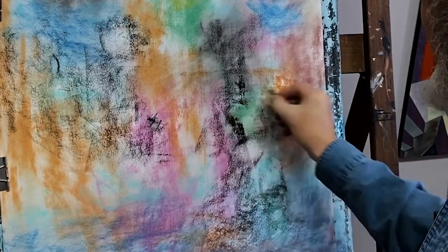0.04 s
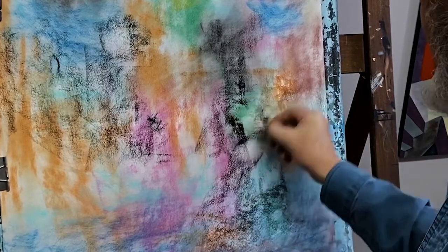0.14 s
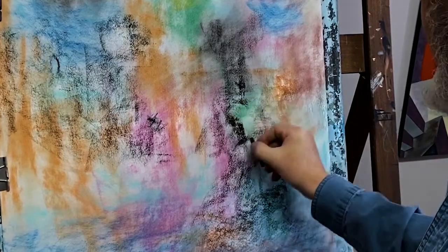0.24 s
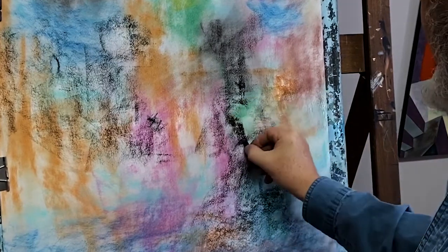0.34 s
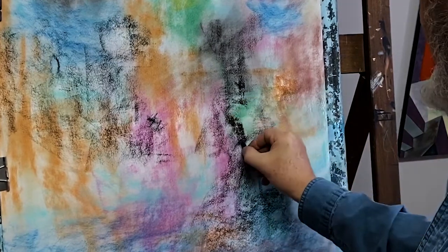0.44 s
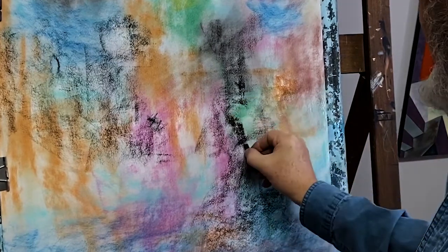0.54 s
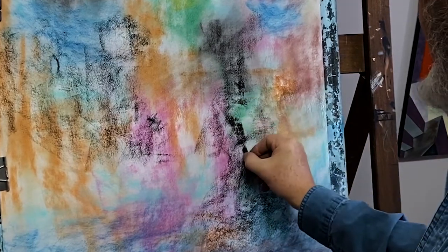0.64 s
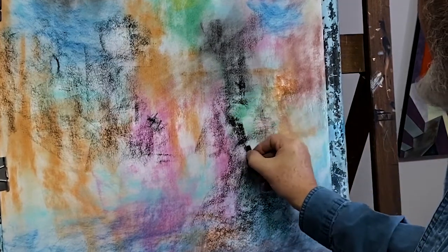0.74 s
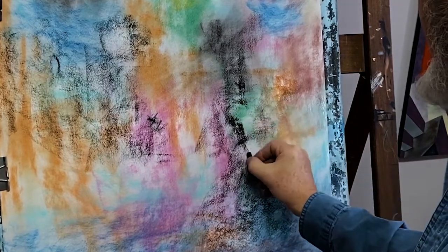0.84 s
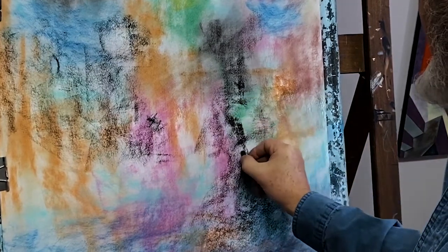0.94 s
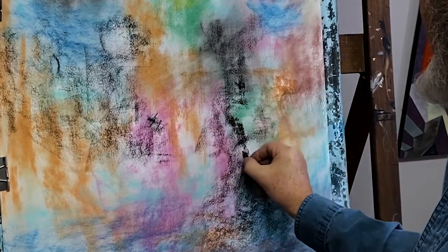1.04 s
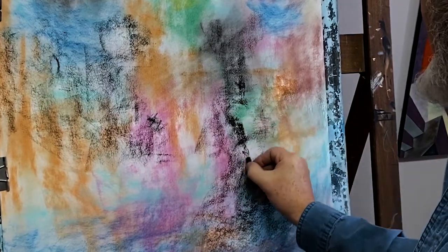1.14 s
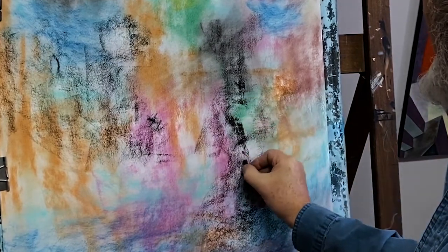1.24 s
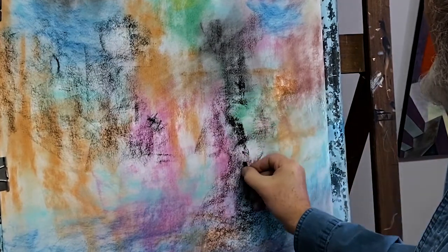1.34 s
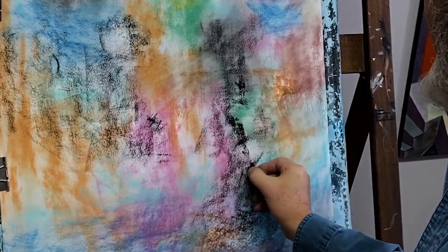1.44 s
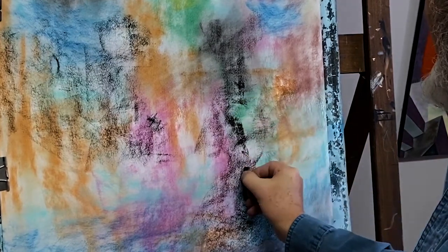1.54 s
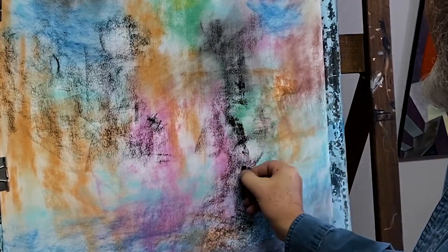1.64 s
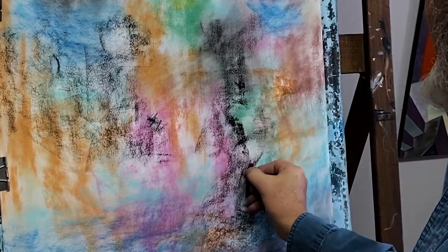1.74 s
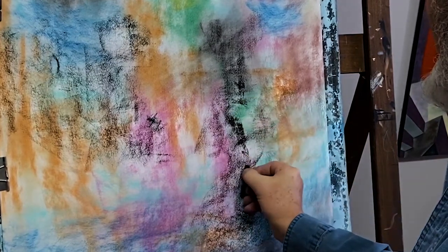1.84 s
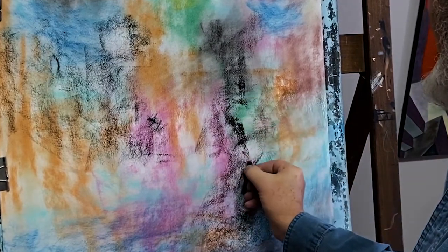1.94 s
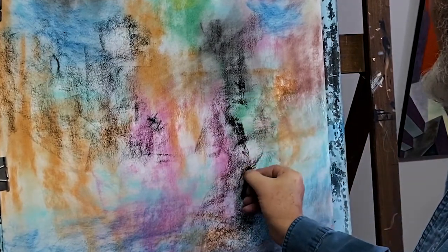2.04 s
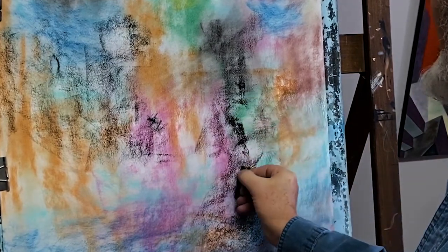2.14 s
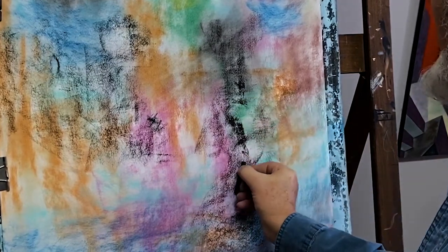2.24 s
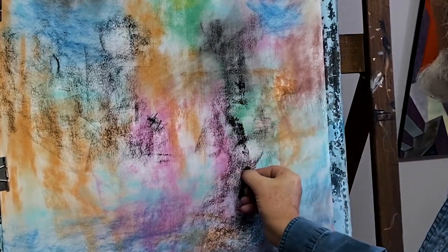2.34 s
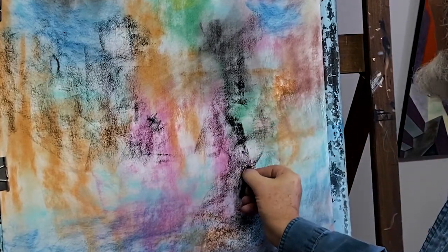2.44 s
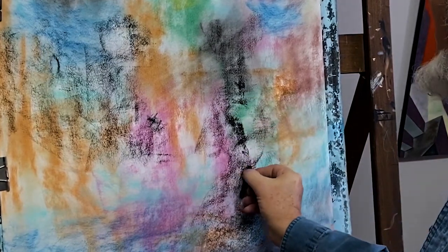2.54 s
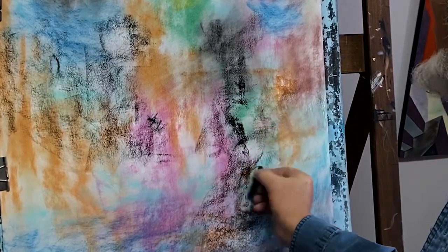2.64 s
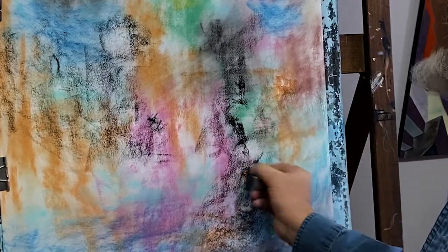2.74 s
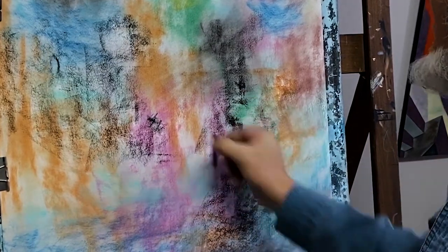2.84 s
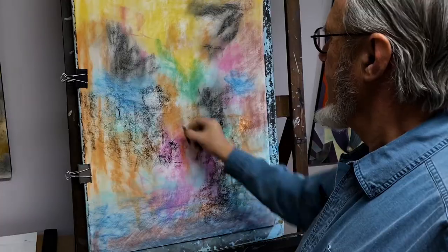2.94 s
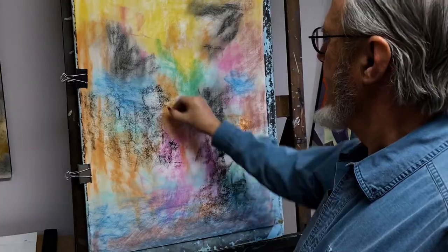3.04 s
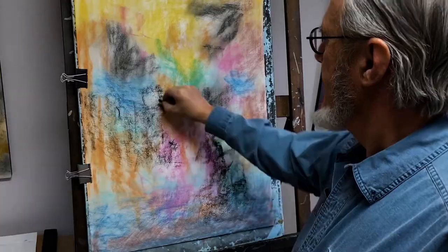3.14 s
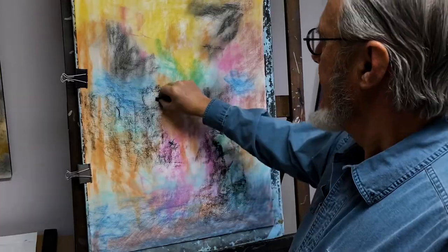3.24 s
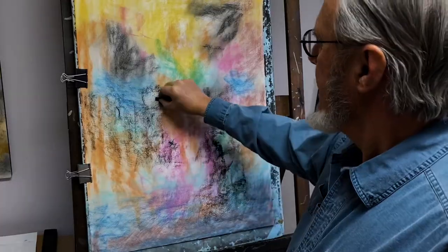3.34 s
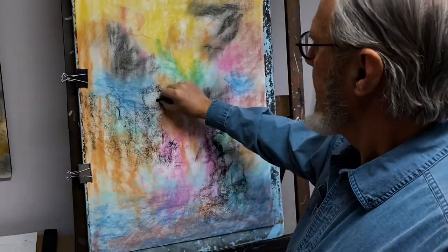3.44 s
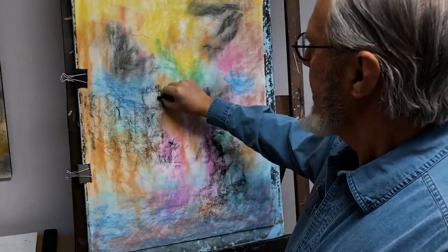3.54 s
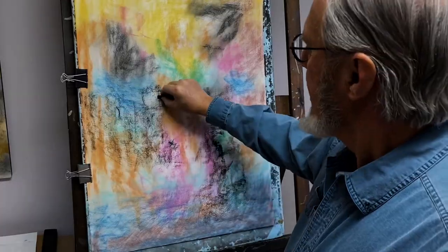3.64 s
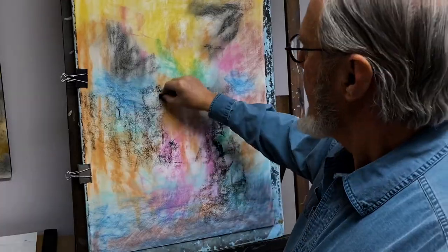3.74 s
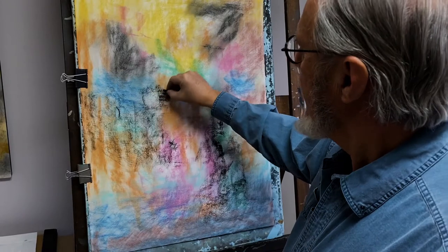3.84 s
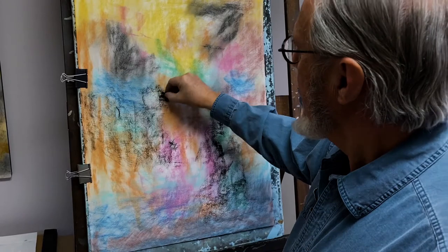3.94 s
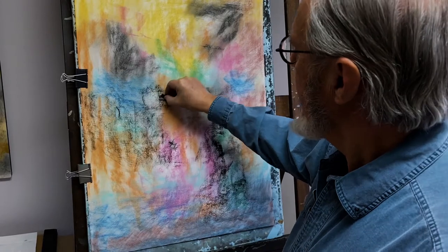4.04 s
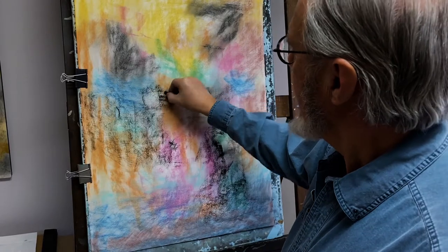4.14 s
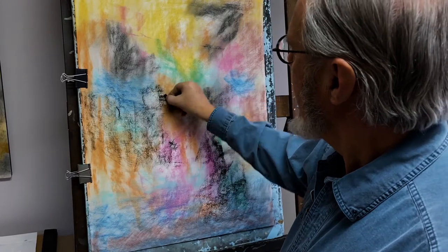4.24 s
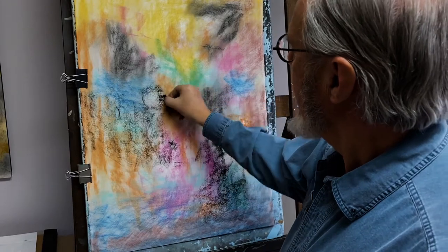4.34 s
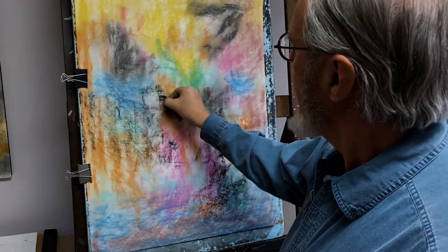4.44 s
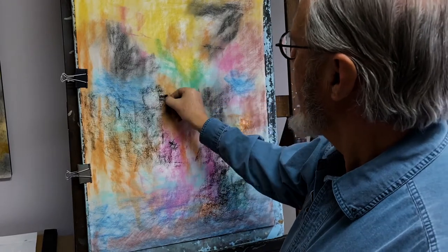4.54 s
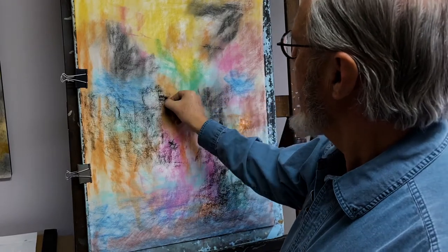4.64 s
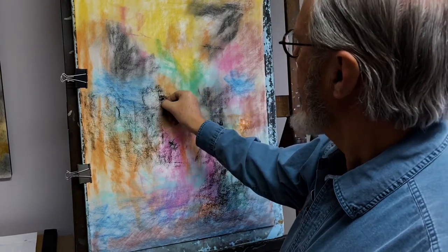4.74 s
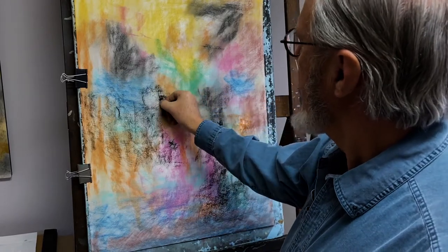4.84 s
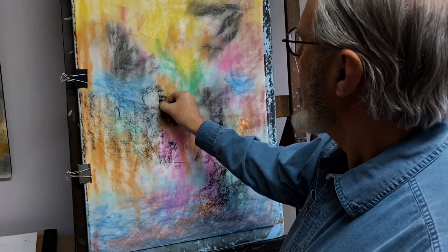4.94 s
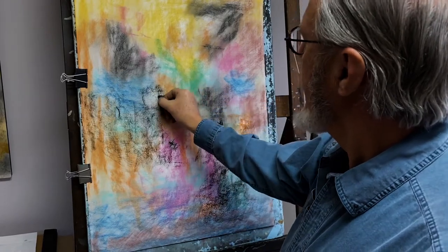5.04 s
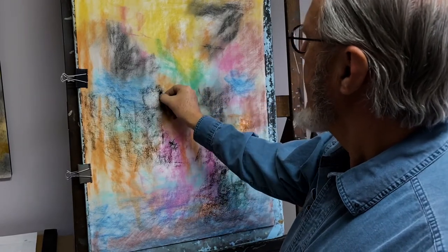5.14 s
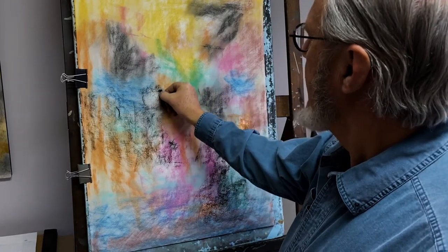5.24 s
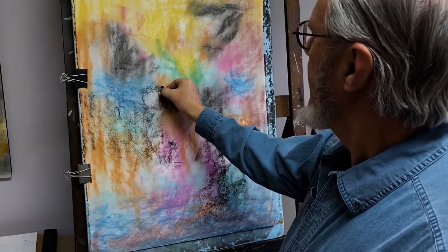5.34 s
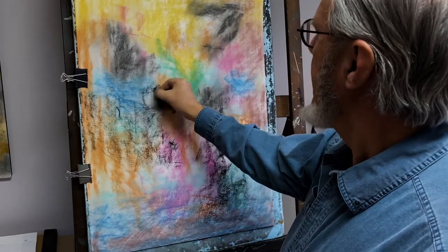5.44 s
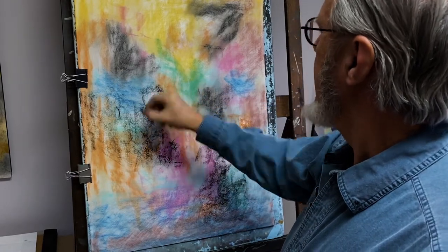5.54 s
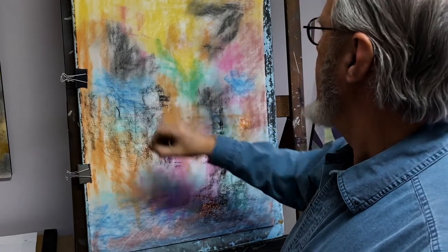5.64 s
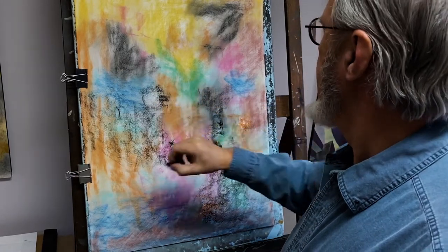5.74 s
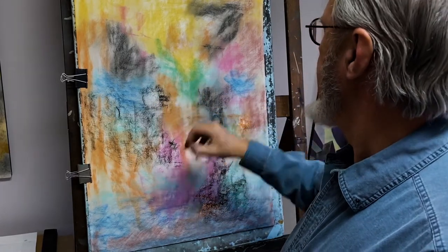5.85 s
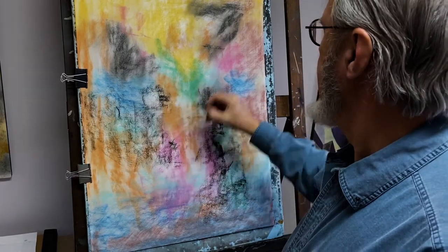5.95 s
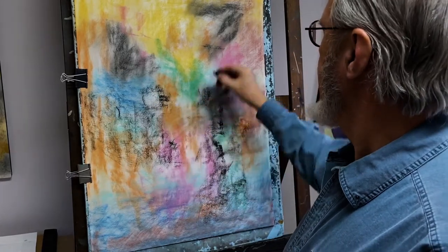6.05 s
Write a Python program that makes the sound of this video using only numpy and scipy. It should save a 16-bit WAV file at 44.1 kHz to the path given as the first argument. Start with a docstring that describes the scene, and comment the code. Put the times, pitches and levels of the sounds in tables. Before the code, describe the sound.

Close, uneven pastel taps and gritty strokes on rough paper, the wooden board thumping softly and its steel clips buzzing in a hushed room.

```python
"""In a quiet studio, a dry pastel stick dabs and scratches paper clipped to a board on an easel.
Dabs knock the board's resonances, ring its steel clips, slap the paper and tick; hard blows swing the board.
Strokes are clumped noise: hiss and sizzle off the paper's tooth, rumble in the board, buzz in the clips.
Landings snap, a sliding hand rubs hollowly, and low room noise with a faint airy tone lies beneath.
Two spaced microphone ports hear the treble a little apart in time."""
import sys
import numpy as np
from scipy import signal
from scipy.fft import rfft, irfft, next_fast_len
from scipy.io import wavfile
from scipy.ndimage import uniform_filter1d, map_coordinates

SR = 44100
rng = np.random.default_rng(int(sys.argv[2]) if len(sys.argv) > 2 else 0)


def persist_wave(psi):
    """Save psi, clipped to +-1, as 16-bit WAV."""
    counts = np.round(np.clip(psi, -1, 1) * 32767).astype(np.int16)
    wavfile.write(sys.argv[1], SR, np.atleast_2d(counts).T)


N = 269010  # samples


def amp(db):
    """Decibels to gain."""
    return 10 ** (np.asarray(db) / 20)


def unit(x):
    """Scaled to rms 1."""
    return x / np.sqrt(np.mean(x ** 2) + 1e-20)


def along(points, hz):
    """Read a (f/Hz, value) curve on a log frequency axis."""
    f, value = np.transpose(points)
    return np.interp(np.log(hz + 1), np.log(f + 1), value)


def colour(points):
    """Frequency response that follows a (f/Hz, level/dB) curve."""
    return lambda hz: amp(along(points, hz))


def filtered(x, response):
    """Filter x by a complex response of frequency."""
    size = next_fast_len(N + SR // 2)
    spectrum = rfft(x, size) * response(np.fft.rfftfreq(size, 1 / SR))
    return irfft(spectrum, size)[..., :N]


def modes(table):
    """Causal sum of resonances of alternating sign, none sharper than damped metal allows."""
    def response(f):
        total = 0
        for k, (centre, width, db) in enumerate(table):
            width = max(width, centre / 240)
            resonance = 1j * f * width / (centre * centre - f * f + 1j * f * width)
            total = total + (-1) ** k * amp(db) * resonance
        return total
    return response


def driven(force, response):
    """Two unrelated noises under the force, coloured so that a steady force of 1 gives rms 1."""
    gain = np.sqrt(np.mean(np.abs(response(np.fft.rfftfreq(SR // 2, 1 / SR))) ** 2))
    return filtered(force * rng.standard_normal((2, N)), response) / gain


# Colour of the low room noise: f/Hz, level/dB (per Hz, relative)
ROOM_COLOUR = [(15, -57), (25, 3.5), (45, 11.5), (76, 4.5), (152, -7.5), (349, -11.5), (488, -31),
               (682, -23), (756, -23.5), (1680, -27), (2130, -31.5), (12000, -54), (15600, -72),
               (22000, -120)]
# Resonances of the faint airy tone: f/Hz, width/Hz, level/dB
AIRY_MODES = [(458, 98, -11), (1684, 40, -2.5), (2390, 380, -16)]
# How the airy tone comes and goes: t/s, level/dB
AIRY_LEVEL = [(2.7, -93), (2.88, -67.5), (3.09, -69.5), (3.2, -88.5)]
ROOM_DB = -50.5


def studio():
    """Steady low noise of the room, and noise through resonances as an airy tone that comes and goes."""
    swell = amp(np.interp(np.arange(N) / SR, *np.transpose(AIRY_LEVEL)))
    room = amp(ROOM_DB) * driven(0.87, colour(ROOM_COLOUR))
    return room + driven(swell, modes(AIRY_MODES))


# The hand's hollow rub over the paper: t/s, level/dB (before trim), f/Hz (steers the blend of two notes)
HAND_SLIDE = [(3.28, -50, 467), (3.366, -47, 435), (3.41, -51, 503), (3.474, -32.5, 483),
              (3.516, -45.5, 464), (3.548, -42.5, 530), (3.584, -45.5, 510), (3.64, -63, 434),
              (3.68, -58, 477)]


def slide():
    """Skin on paper sounds a cavity under the palm; its pitch moves between two fixed resonances."""
    s, db, hz = np.transpose(HAND_SLIDE)
    t = np.arange(N) / SR
    force = amp(np.interp(t, s, db - 3.5, left=-120, right=-120))
    high = np.clip((np.interp(t, s, hz) - 440) / 160, 0, 1)
    low_note = driven(force, modes([(450, 100, 0)]))
    high_note = driven(force, modes([(590, 100, 0)]))
    return np.sqrt(1 - high) * low_note + np.sqrt(high) * high_note


# The stick lands out of the air with a snap: t/s, level/dB (snap peak, before trim)
LANDINGS = [(0.2543, -31), (0.583, -56), (0.674, -49), (0.7173, -34), (1.067, -41), (1.395, -34.5),
            (2.4645, -68), (3.1, -56), (3.1275, -29.5), (3.705, -42), (3.868, -50), (4.4812, -55),
            (4.971, -43), (5.1684, -55), (5.365, -40), (5.4039, -29), (5.5583, -43)]


def landings():
    """Force of the brief snaps, and the share of scratching left while the stick nears the paper."""
    snap, contact = np.zeros(N + SR), np.ones(N)
    t = np.arange(SR // 20) / SR
    for s, db in LANDINGS:
        k = round(s * SR)
        snap[k:][:len(t)] += amp(db - 1.0 - 60 * t / 0.01)  # falls 60 dB in 10 ms
        contact[k - len(t):k] *= amp(-9 * np.exp(-t[::-1] / 0.0023))
    return snap[:N], contact


def patchy(x, depth_db):
    """Random gain in patches of time and frequency: the paper's tooth is uneven."""
    z = signal.stft(x, nperseg=256)[2]
    field = uniform_filter1d(rng.standard_normal(z.shape[1:]), size=4, axis=0)
    field = uniform_filter1d(field, size=8, axis=1)
    return signal.istft(z * unit(amp(depth_db * unit(field))), nperseg=256)[1][:, :N]


# Strokes of the stick: start t/s, swell t/s, hiss peak level/dB, hiss fade/dB per s,
# and over the hiss: board rumble level/dB, sizzle level/dB (levels before each layer's trim)
STROKES = [(0.031, 0.047, -93.5, 148, 40, -14), (0.25, 0.1, -45.5, 111, 12, -9.5),
           (0.47, 0.043, -55, 191, 5, -6), (0.585, 0.012, -56.5, 245, 12, -15),
           (0.675, 0.073, -52, 97, 14.5, -6.5), (0.78, 0.03, -54, 220, -6, -4),
           (0.911, 0.061, -53.5, 240, 6, -6), (1.068, 0.099, -54, 135, 18.5, -7.5),
           (1.285, .01, -64, 77, 18.5, -14), (1.398, 0.045, -43.5, 176, 11.5, -4),
           (1.54, 0.035, -52.5, 150, 6, -8), (1.6, .012, -60, 300, 26, -20),
           (1.64, 0.038, -58.5, 95, 14.5, -8), (1.77, .05, -59, 44, 7.5, -7.5),
           (1.91, 0.13, -56, 112, -3, -6.5), (2.13, 0.1, -59, 119, 8.5, -10),
           (2.467, 0.061, -52, 210, 6, -7.5), (3.124, 0.028, -44.5, 151, 12.5, -4.5),
           (3.25, 0.011, -62, 48, 15, -9), (3.402, 0.06, -53, 127, 6.5, -7.5),
           (3.52, 0.033, -58.5, 91, 14, -12.5), (3.7, 0.022, -57, 140, 16, -13),
           (3.888, 0.027, -44, 157, 17, -3.5), (4.02, 0.028, -65, 53, 15.5, -10),
           (4.31, 0.057, -54.5, 277, 6, -10), (4.482, .02, -51, 89, 15, -5.5),
           (4.6, 0.051, -56, 178, 5, -7), (4.782, 0.049, -58, 38, 8, -10), (4.84, 0.065, -61, 65, -2, 1.5),
           (4.968, .015, -51.5, 100, 15, -2.5), (5.14, 0.066, -56, 112, 11, -7.5),
           (5.25, 0.055, -56.5, 280, 3, -4), (5.368, 0.079, -52, 131, 15, -9.5),
           (5.555, 0.013, -60, 121, 19, -14)]
SWELL_FROM_DB = -6  # a stroke's swell begins this far under its peak
SOFT_START_S = 0.0099  # the stick settles onto the paper


def pressure(levels_db, lingers):
    """Force of all strokes: each swells to its peak, then fades as the stick lifts; powers add."""
    power, t = np.zeros(N + SR), np.arange(3 * SR // 4) / SR
    settle = 1 - np.exp(-t / SOFT_START_S)
    for (s, swell, _, fade, *_), db in zip(STROKES, levels_db):
        swelling_db = SWELL_FROM_DB * (1 - t / swell)
        fading_db = -fade * (t - swell) / lingers
        shape_db = np.where(t < swell, swelling_db, fading_db)
        power[round(s * SR):][:len(t)] += (amp(db + shape_db) * settle) ** 2
    return np.sqrt(power[:N])


def wander(rate_hz):
    """Random force that takes a new value at the given rate, smoothly joined."""
    values = rng.standard_normal(int(N * rate_hz / SR) + 4)
    return map_coordinates(values, [np.arange(N) / SR * rate_hz])


# Resonances of the easel and board: f/Hz, width/Hz, level/dB
BOARD = [(56, 38, -3), (108.2, 26.6, -1.5), (201.6, 34.3, 2.5), (329, 108, -6), (434, 20.2, -10.5),
         (592, 72, -12), (759, 137, -14), (1006.5, 202, -10), (1020, 109, -9)]
DEEP = 4  # how many board modes are the deep ones
# Ringing of the steel clips: f/Hz, width/Hz, level/dB
CLIPS = [(1096, 46, -3), (1279, 48, 1), (1344, 31, 7.5), (1462, 49, 3), (1620, 81, -3), (2165, 150, -14.5),
         (2712, 50, -6.5), (2930, 25, -12), (3540, 15, -8.5), (4640, 24, -22.5), (6700, 200, -25),
         (7990, 150, -24)]
# Hiss of the paper's tooth: f/Hz, level/dB (per Hz, relative)
TOOTH = [(300, -120), (600, 3.5), (1500, 8.5), (3000, 4.5), (5000, -1), (7000, -6.5), (11000, -16),
         (16000, -18)]
# The stick's edge meeting the paper: f/Hz, level/dB (per Hz, relative)
TICK = [(1200, -120), (2000, 9), (4000, 9.5), (7000, 9.5), (11000, 3), (16000, 2)]
DUST_HZ = 8500  # above it crumbling pigment sizzles
DEEP_LINGERS, UPPER_LINGERS, SIZZLE_LINGERS = 1.46, 1.18, 0.69  # fading time over that of the hiss


def strokes():
    """The stick skips over the paper's fibres: clumped grains of force hiss, rumble and buzz the clips."""
    hiss_db, _, rumble_db, sizzle_db = np.transpose(STROKES)[2:]
    snap, contact = landings()
    clumps = .5 * wander(23) + 1.2 * wander(110) + 1.1 * wander(400)
    grain = contact * unit(amp(clumps))

    def sizzle_share(hz):  # share of power
        return 1 / (1 + (DUST_HZ / (hz + 1)) ** 8)

    def hiss_colour(hz):
        return amp(along(TOOTH, hz)) * np.sqrt(1 - sizzle_share(hz))

    def sizzle_colour(hz):
        return amp(along(TOOTH, hz)) * np.sqrt(sizzle_share(hz))

    hiss = driven(pressure(hiss_db + 6.0, 1) * grain, hiss_colour)
    sizzle = driven(pressure(hiss_db + sizzle_db + 7, SIZZLE_LINGERS) * grain, sizzle_colour)
    board_db = hiss_db + rumble_db
    deep = driven(pressure(board_db - 5.0, DEEP_LINGERS) * grain, modes(BOARD[:DEEP]))
    upper = driven(pressure(board_db - 6.5, UPPER_LINGERS) * grain, modes(BOARD[DEEP:]))
    buzz = driven(pressure(board_db - 19.5, UPPER_LINGERS) * grain, modes(CLIPS))
    snaps = driven(snap, colour(TICK))
    return patchy(hiss + sizzle, depth_db=2.0) + buzz + deep + upper + snaps


# Hard blows that swing the whole board: t/s, peak level/dB, and over it: upper modes level/dB,
# easel's lowest sway level/dB, its second sway level/dB (before trim and chance)
BLOWS = [(0.2565, -18, 4, -34, -17), (0.678, -33, -1, -6, -13), (1.07, -23.5, -28, -28, -19),
         (1.402, -12.5, -7, -30, -23.5), (2.361, -47.5, -15, -2, 7.5), (3.131, -25.5, -25, -4, -7),
         (3.8921, -11.5, 3.5, -19, -28), (4.505, -24.5, -7, -13, -23), (4.971, -30.5, -6, -13, -20),
         (5.354, -29.5, -6, -28, -23)]


def thumps():
    """Direct swing of the board: modes start together, neighbours opposed; the easel's two low ones sway longer."""
    out, t = np.zeros(N + SR), np.arange(SR // 2) / SR
    scatter_db = 2.5 * rng.standard_normal((len(BLOWS), len(BOARD)))
    for (s, db, upper_db, *sway_db), chance in zip(BLOWS, scatter_db):
        start = round((s - .0012) * SR)
        for k, (hz, _, mode_db) in enumerate(BOARD):
            if k < 2:
                lean_db, t60 = sway_db[k] + 7.5, .4
            elif k < DEEP:
                lean_db, t60 = -3, .09
            else:
                lean_db, t60 = upper_db + 2.5, .07
            swing = (-1) ** k * np.sin(2 * np.pi * hz * t) * (1 - np.exp(-t * hz * 2.3))
            level_db = db + mode_db + lean_db + chance[k]
            out[start:][:len(t)] += amp(level_db - 60 * t / t60) * swing
    return out[:N]


# Dabs, light first touches and rebounds of the board: t/s, rattle peak level/dB, and over the rattle:
# deep knock level/dB, upper knock level/dB, stick's tick level/dB (before each layer's trim)
DABS = [(0.0341, -38.5, -1.5, -2, -52), (0.198, -71.5, 23, 26.5, -17), (0.251, -44.5, -9, -9, 3),
        (0.2585, -24, 4.5, 6, -11.5), (0.337, -21.5, -8, -8, -8.5), (0.4572, -34, -2.5, -21, -31),
        (0.5874, -31, -5, -4, -14), (0.676, -49, 17.5, 17.5, 12), (0.7232, -31.5, -22, -21, -4),
        (0.758, -32, -6, -8, -25), (1.03, -35.5, -2, -4, -24), (1.071, -43.5, 15, 2, -1),
        (1.1142, -26.5, -28, -29, -13), (1.156, -28, -11, -15, -25), (1.294, -31.5, -4.5, -5, -31),
        (1.398, -52, -5, 9, -22), (1.402, -27, -4, 6, -35), (1.438, -25, 6, -3, -22),
        (1.606, -24.5, -4.5, -16, -16), (1.732, -33, -5, -3.5, -42), (1.9016, -40.5, -2, -0.5, -11),
        (2.0573, -36.5, -3.5, -2.5, -10.5), (2.189, -31.5, -3, -7, -17), (2.327, -35.5, -0.5, -2, -31),
        (2.47, -33.5, -4.5, -9, -33), (2.615, -37, -3.5, -3, -24), (2.7725, -41, 1, -1, -45),
        (3.104, -46, 10, 10.5, -5), (3.131, -37, 16, 4, -23), (3.708, -26.5, -3, -11.5, -27),
        (3.873, -26, -10, 2, -32), (3.8967, -22.5, 2, 5.5, -47), (4.0194, -49.5, -9, 11.5, 11.5),
        (4.0996, -33.5, -7, -7.5, -22), (4.2004, -41, -4.5, 0.5, -28), (4.484, -41, -6, 1, -19),
        (4.507, -25, -4, -11, -17.5), (4.654, -30, -1, -6.5, -40), (4.9747, -25, -15, -16, -19),
        (5.1217, -29, -3, -7, -18), (5.1694, -42, -11, -19, 3.5), (5.2265, -26, -3.5, -3.5, -22),
        (5.356, -54.5, 23, 12, -11), (5.406, -20.5, -9, -11, -10), (5.563, -27, -6, -8.5, -20),
        (5.7283, -36, -2, -6, -35), (5.895, -41, -2.5, -4, -20.5), (6.0574, -42.5, -2, 0, -30)]
ONSET_S = 0.0046  # a contact starts this long before it is heard at strength
DAB_T60_S = 0.41  # common decay time, stretched for each layer


def bursts(levels_db, stretch, rise):
    """Force of all contacts: each rises fast and dies away in the room; powers add."""
    power, t = np.zeros(N + SR), np.arange(SR // 2) / SR
    decay = amp(-60 * t / (stretch * DAB_T60_S))
    shape = (decay * (1 - np.exp(-t / rise))) ** 2
    for (s, *_), db in zip(DABS, levels_db):
        power[round((s - ONSET_S) * SR):][:len(t)] += amp(db) ** 2 * shape
    return np.sqrt(power[:N])


CLIP_BOUNCE_S = .038  # gap between bounces of the loose clips


def struck():
    """Each contact's sharp start rings all clip modes, a little differently; loose clips bounce back twice."""
    out, t = np.zeros(N + SR), np.arange(SR // 5) / SR
    hz, width, mode_db = np.transpose(CLIPS)[..., None]
    width = np.maximum(width, hz / 240)
    decay = np.exp(-np.pi * width * t)
    rings = width / width.mean() * amp(mode_db) * decay * np.cos(2 * np.pi * hz * t)
    rings[1::2] *= -1
    first = rings[1:4].copy()  # the loose clips' modes
    for k in (1, 2):
        late = round(k * CLIP_BOUNCE_S * SR)
        rings[1:4, late:] += amp(3.5 - 6.6 * k) * first[:, :-late]
    chance_db = 3 * rng.standard_normal((len(DABS), len(CLIPS)))
    for (s, db, *_), chance in zip(DABS, chance_db):
        out[round((s - ONSET_S) * SR):][:len(t)] += amp(db - 9.5 + chance) @ rings
    return out[:N]


# Paper slapping the board: f/Hz, level/dB (per Hz, relative)
SLAP = [(300, -120), (500, 11.5), (1200, 7), (2000, 4.5), (3500, -14), (7000, -41), (16000, -58)]
JINGLE_STRETCH = .35  # share of the common decay time that the high clip modes last
JINGLE_GROWS = 1.3  # dB of jingle for each dB of rattle; hard contacts ring brighter


def dabs():
    """Board knock, clip rattle and jingle, paper slap and tick of every contact, each with its own decay."""
    _, rattle_db, deep_db, upper_db, tick_db = np.transpose(DABS)
    deep_force = bursts(rattle_db + deep_db - 3.5, stretch=0.84, rise=0.006)
    upper_force = bursts(rattle_db + upper_db - 9.5, stretch=1.0, rise=0.0014)
    rattle_force = bursts(rattle_db - 13, stretch=0.82, rise=0.00017)
    jingle_force = bursts(JINGLE_GROWS * rattle_db - 6, stretch=JINGLE_STRETCH, rise=0.0025)
    slap_force = bursts(rattle_db - 11.0, stretch=0.56, rise=0.0021)
    tick_force = bursts(rattle_db + tick_db - 6.0, stretch=0.37, rise=0.0028)
    knock = driven(deep_force, modes(BOARD[:DEEP])) + driven(upper_force, modes(BOARD[DEEP:]))
    clips = driven(rattle_force, modes(CLIPS[:5])) + driven(jingle_force, modes(CLIPS[5:]))
    paper = driven(slap_force, colour(SLAP)) + driven(tick_force, colour(TICK))
    direct = (thumps() + struck()) * [[1], [0]]  # only in the sound both ports share
    return knock + clips + paper + direct


# How alike the two ports hear: f/Hz, left-right likeness [0 to 1]
ALIKE = [(60, .995), (150, .97), (300, .87), (640, .5), (1400, .3), (3000, .45), (5000, .6), (8000, .95),
         (16000, .95)]
# Balance: f/Hz, left over right level/dB
LEFT = [(300, 1), (1300, -0.1), (2400, 2), (4400, 4.5), (8000, 0)]
# Timing: f/Hz, phase by which left leads [radians]
LEAD = [(0, 0.041), (700, 0.77), (2700, 1), (4200, 0.35), (6900, 0.17), (15400, -4 * np.pi)]


def ports(pair):
    """Shared and unshared sound over two ports; the treble reaches them a fraction of a millisecond apart."""
    def spread(hz):
        turn = np.arccos(np.clip(along(ALIKE, hz), 0, 1)) / 2
        return np.array([np.cos(turn), np.sin(turn)])

    def skew(hz):  # half to each port, in opposite directions
        left = amp(along(LEFT, hz) / 2) * np.exp(.5j * np.interp(hz, *np.transpose(LEAD)))
        return np.array([left, 1 / left])

    shared, apart = filtered(pair, spread)
    return filtered(np.array([shared + apart, shared - apart]), skew)


def scene():
    """Everything in the studio, at the two ports."""
    return ports(studio() + slide() + strokes() + dabs())


TOP_HZ = 15900  # band limit


def record(dry):
    """The microphone chain rolls off the lowest bass steeply and keeps nothing above its band limit."""
    return filtered(dry, lambda hz: (hz < TOP_HZ) * (1j * hz / (40 + 1j * hz)) ** 4)


dry = scene()
out = record(dry)
persist_wave(out)
```